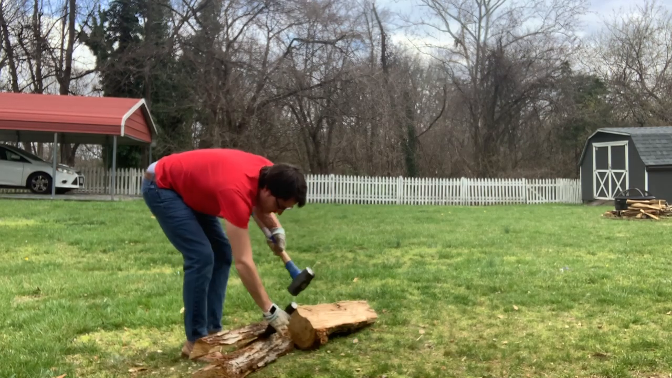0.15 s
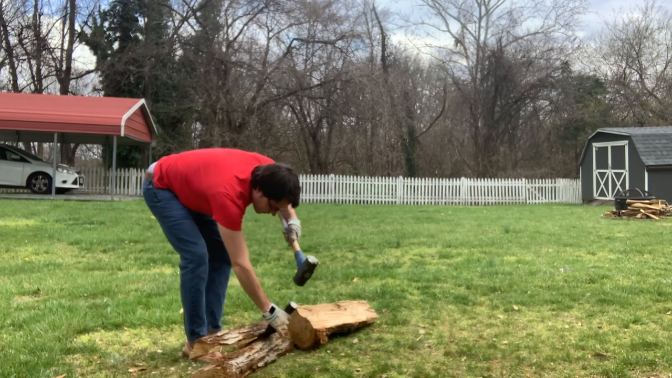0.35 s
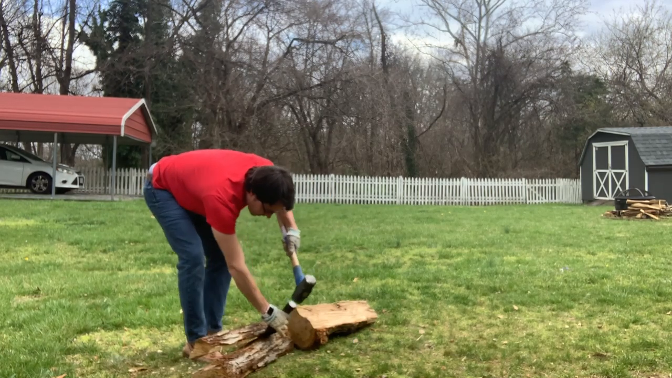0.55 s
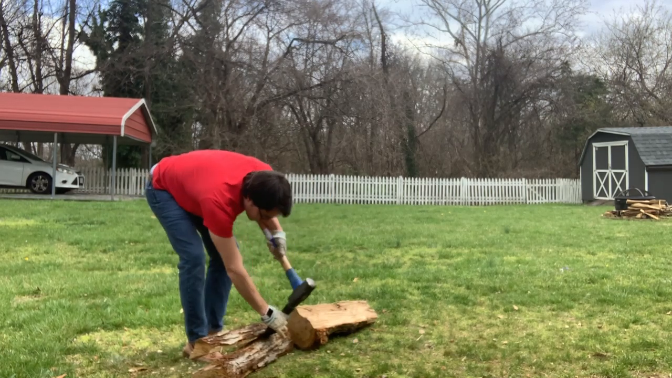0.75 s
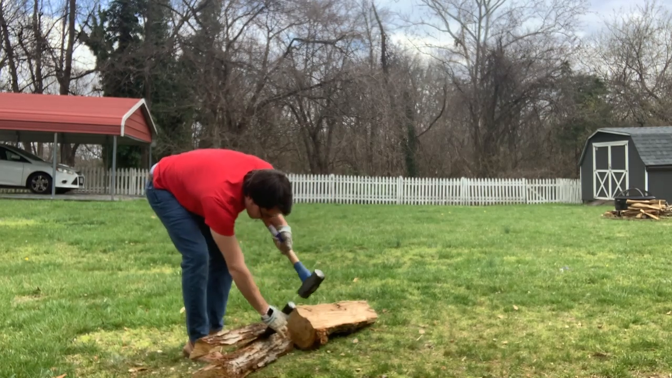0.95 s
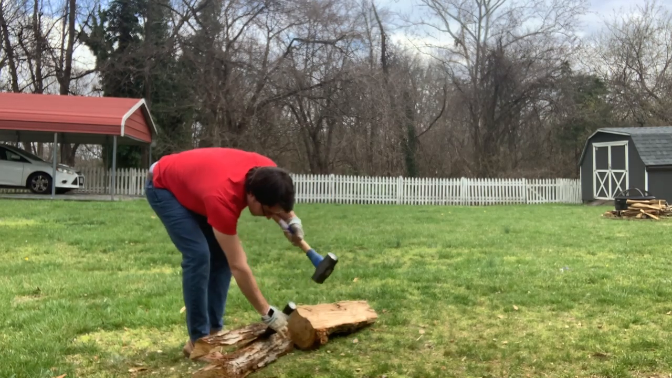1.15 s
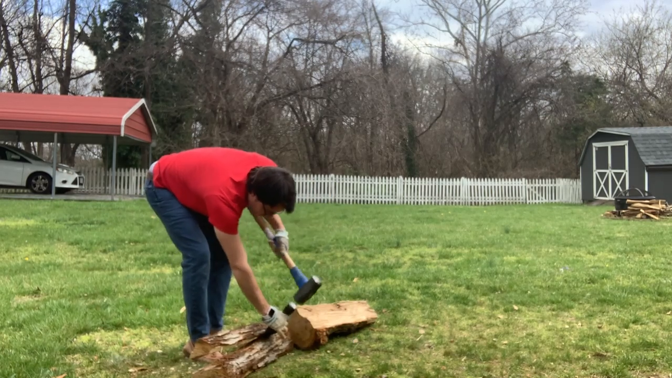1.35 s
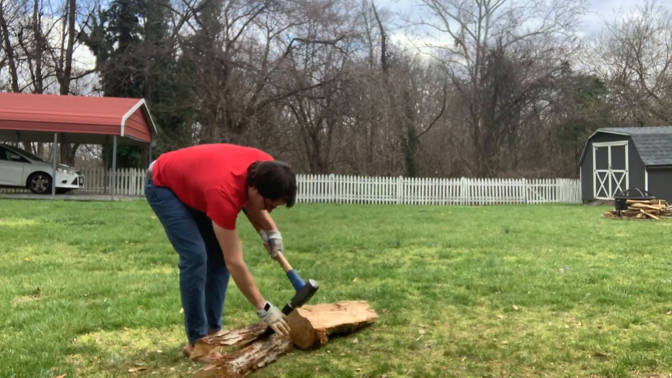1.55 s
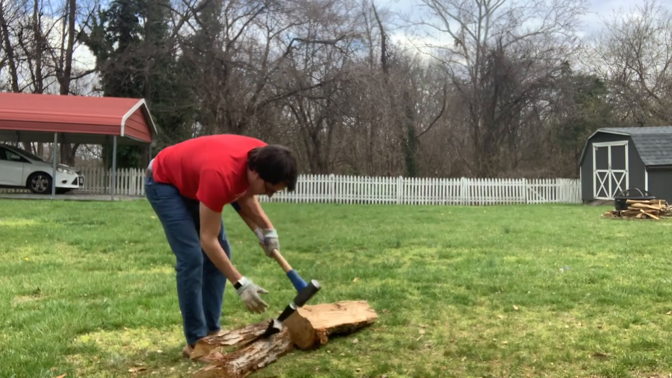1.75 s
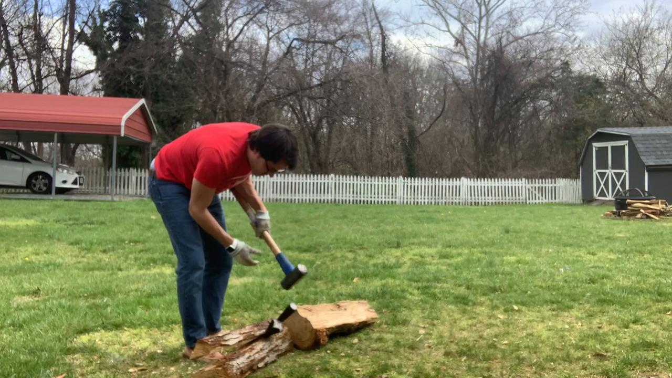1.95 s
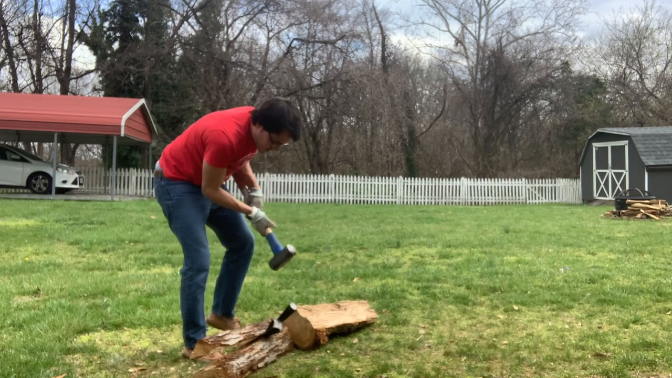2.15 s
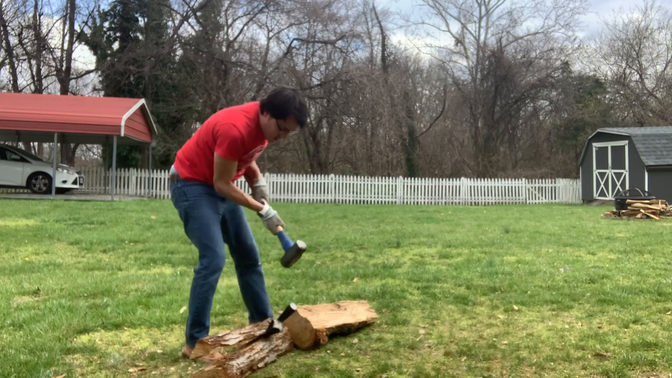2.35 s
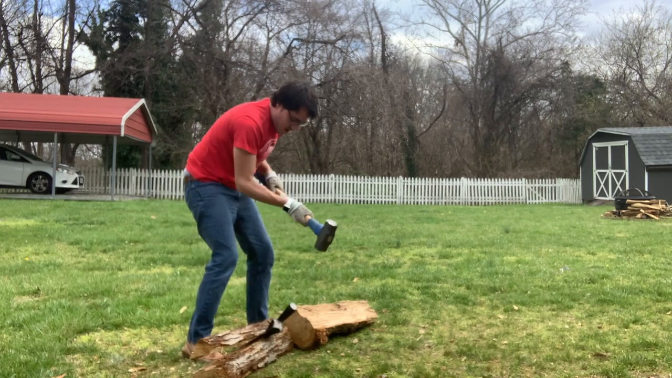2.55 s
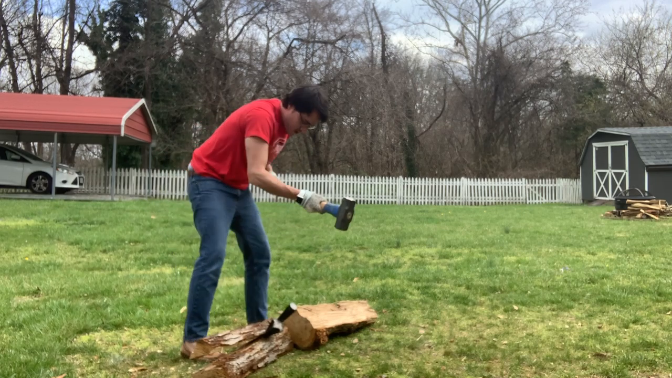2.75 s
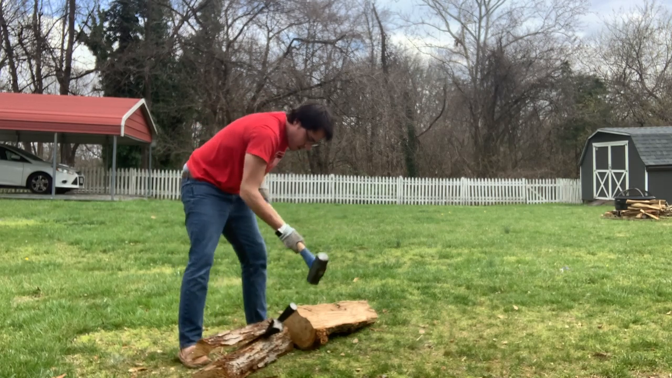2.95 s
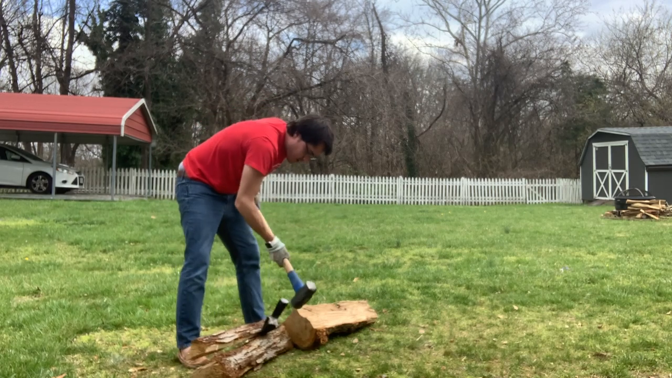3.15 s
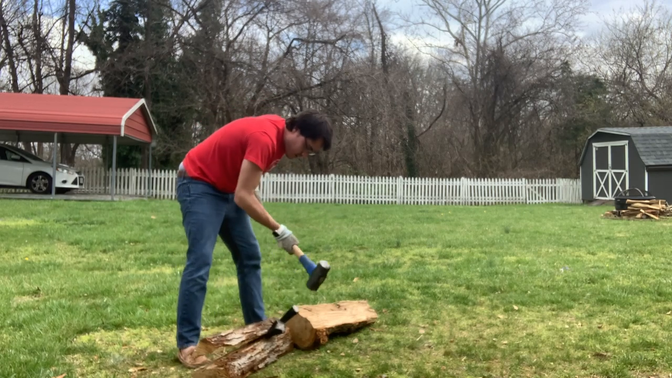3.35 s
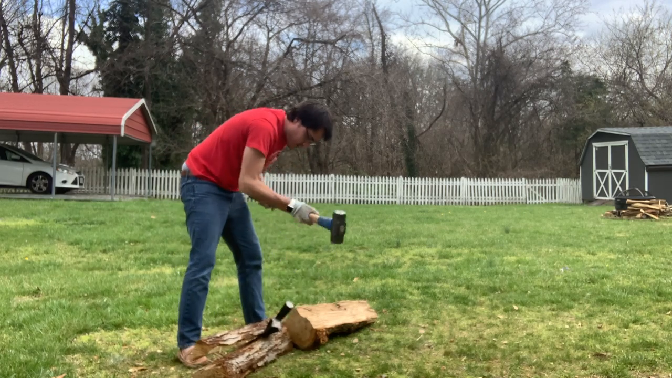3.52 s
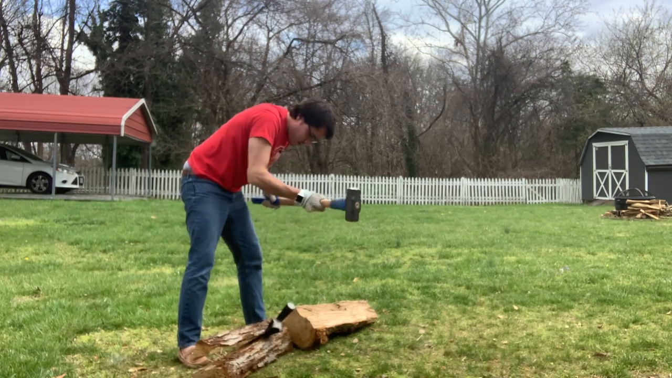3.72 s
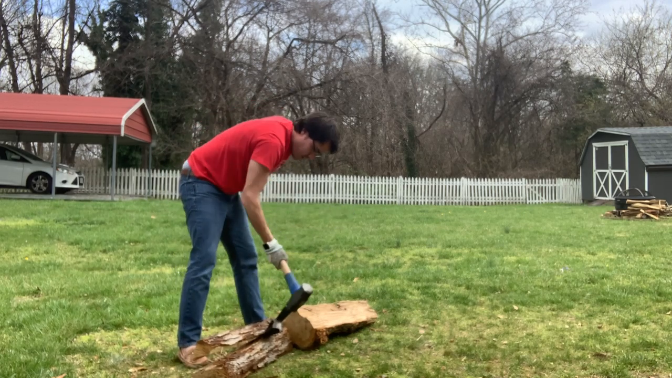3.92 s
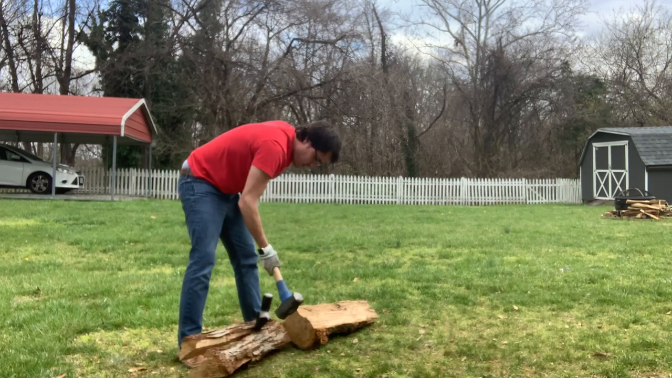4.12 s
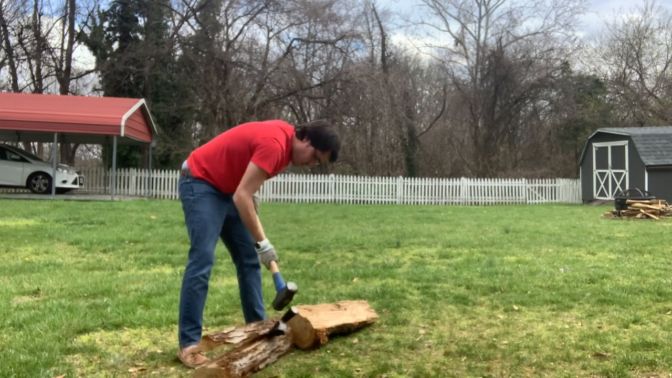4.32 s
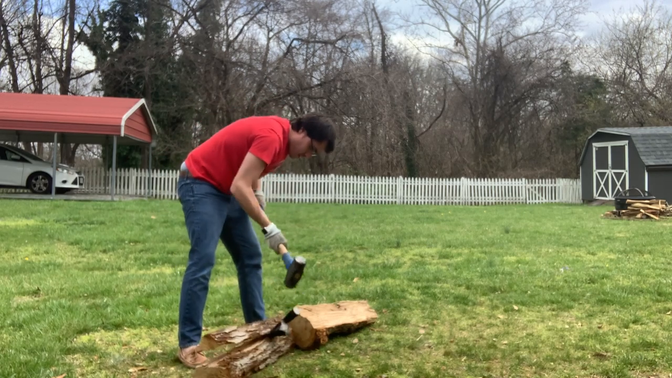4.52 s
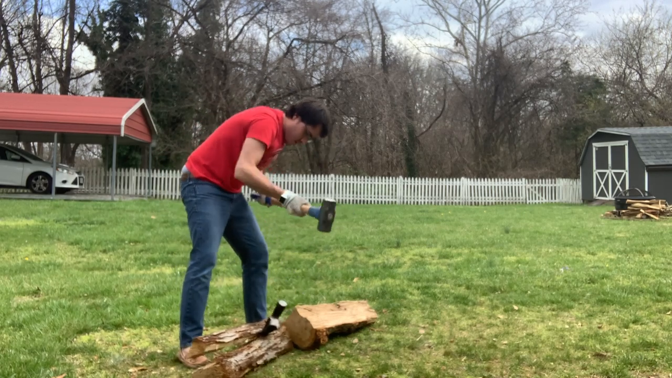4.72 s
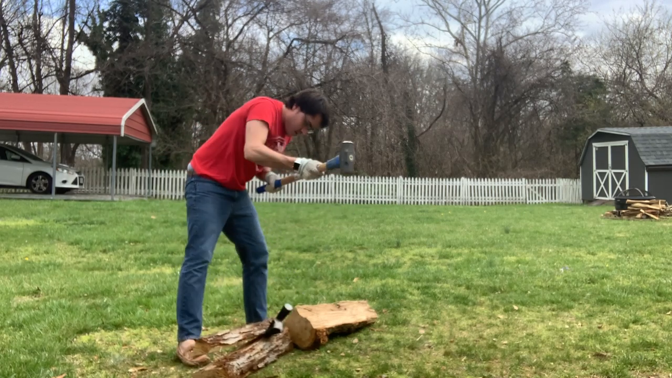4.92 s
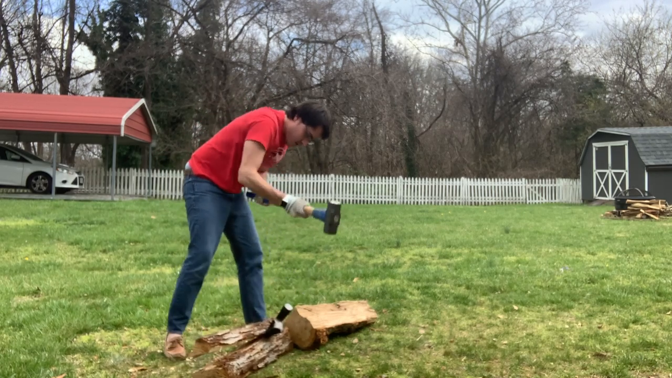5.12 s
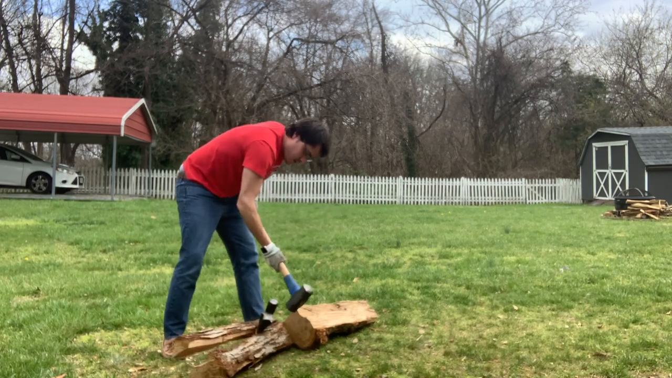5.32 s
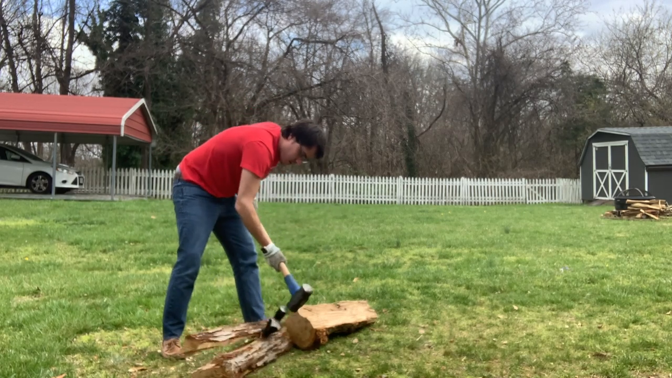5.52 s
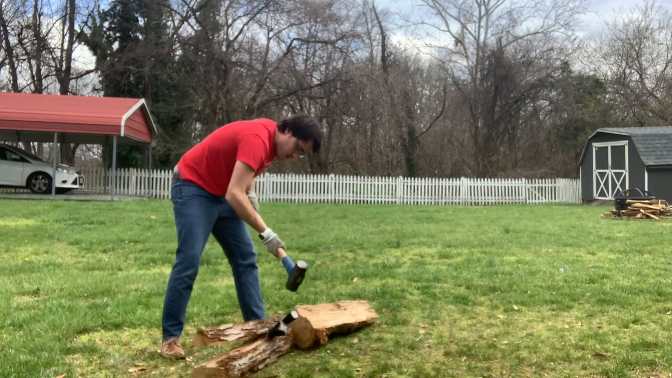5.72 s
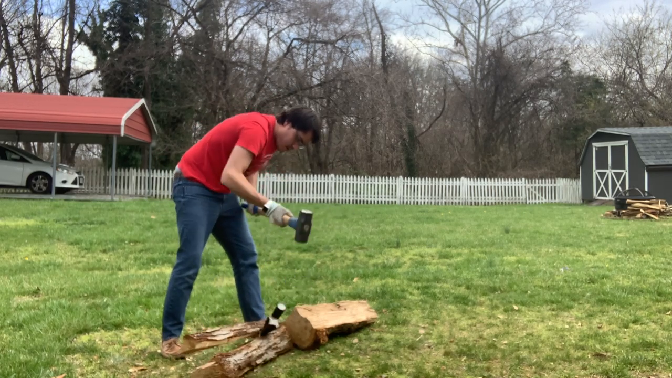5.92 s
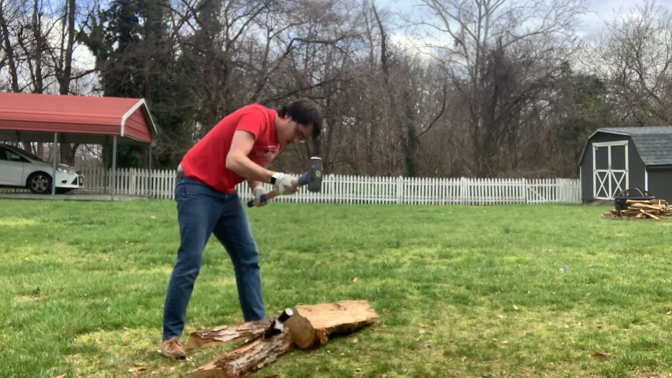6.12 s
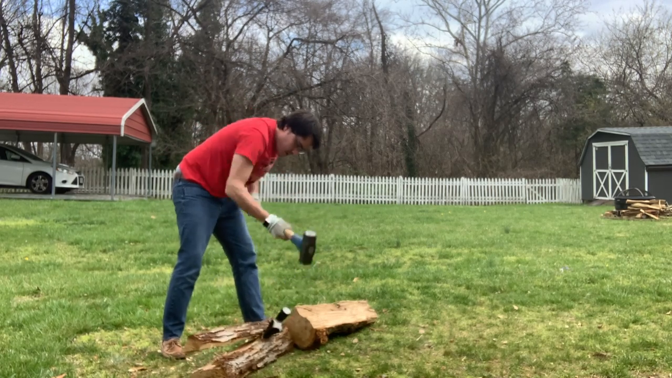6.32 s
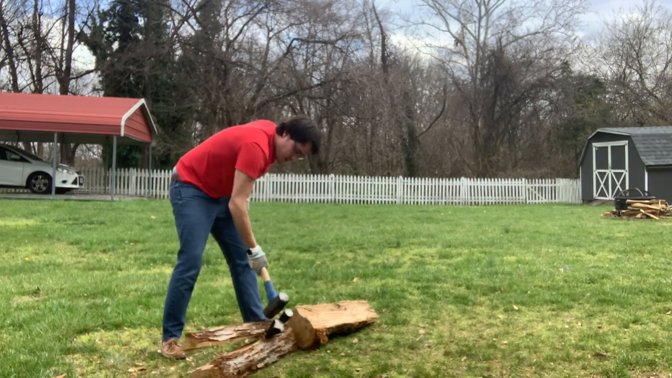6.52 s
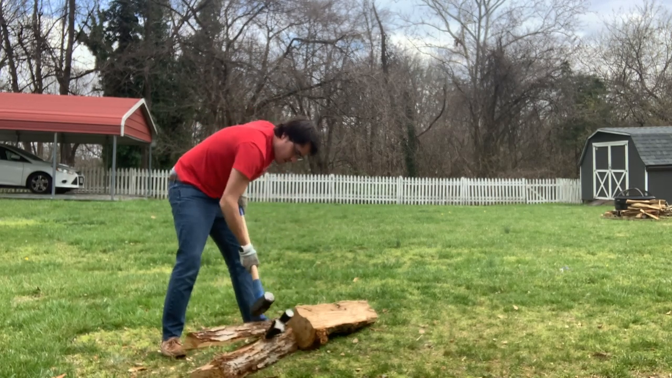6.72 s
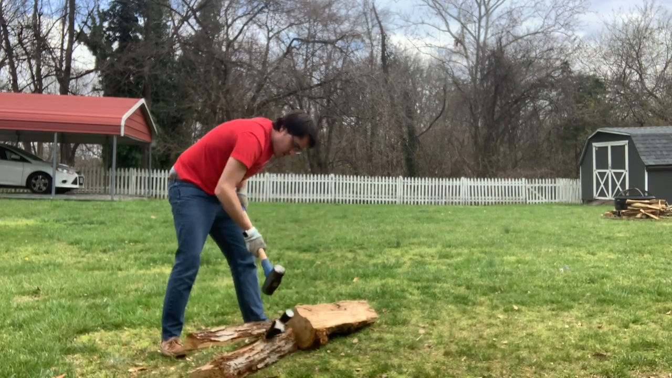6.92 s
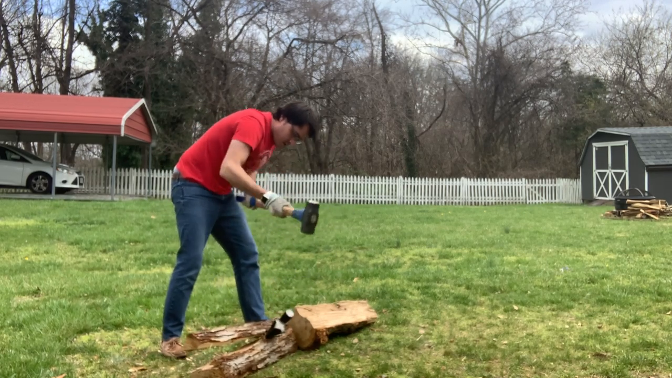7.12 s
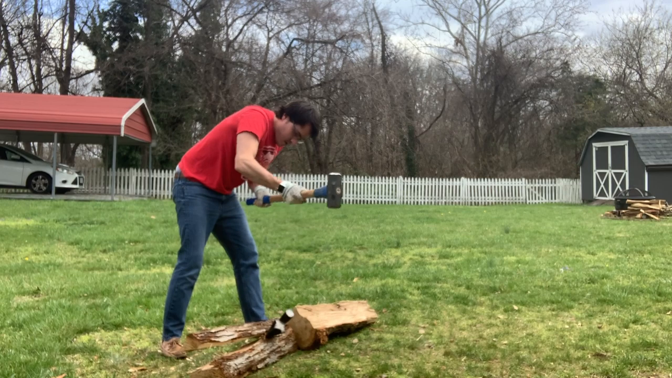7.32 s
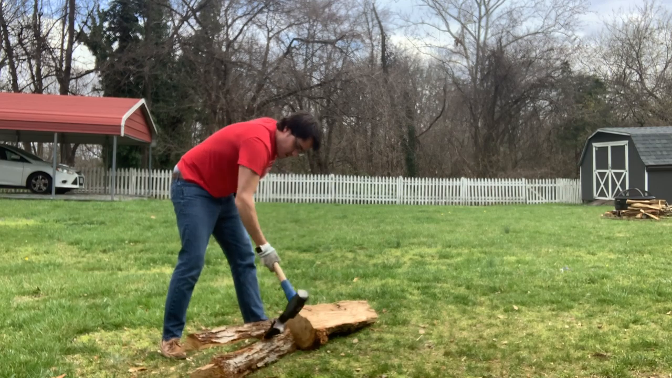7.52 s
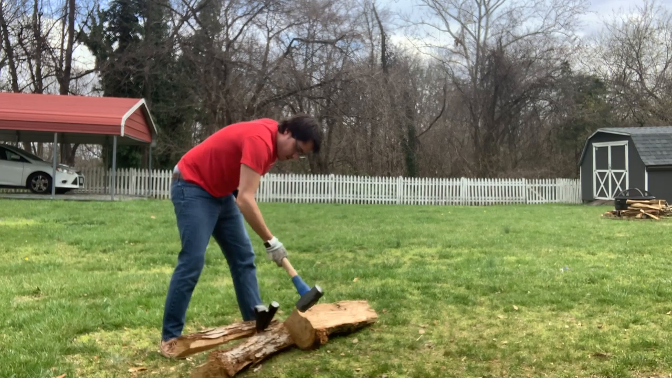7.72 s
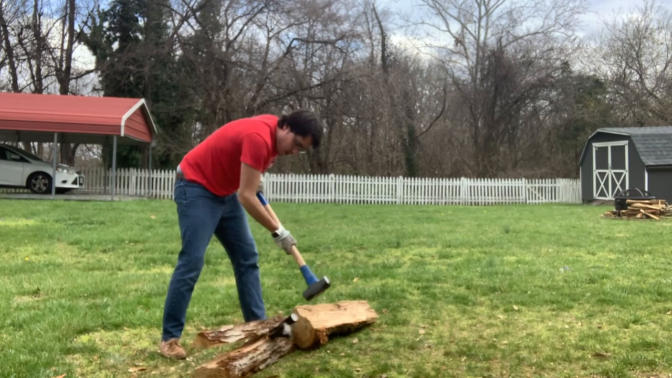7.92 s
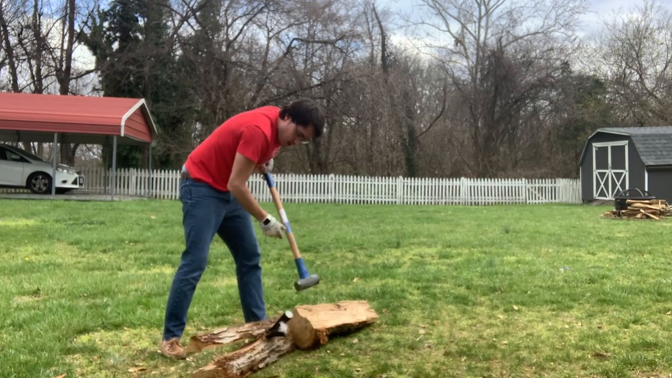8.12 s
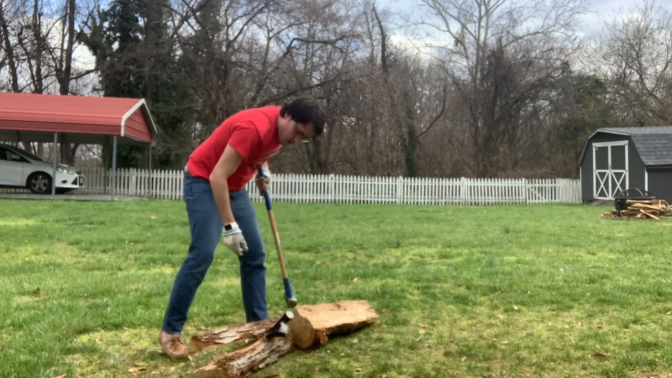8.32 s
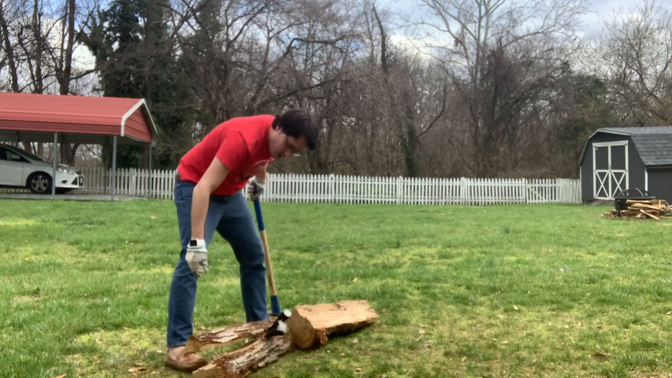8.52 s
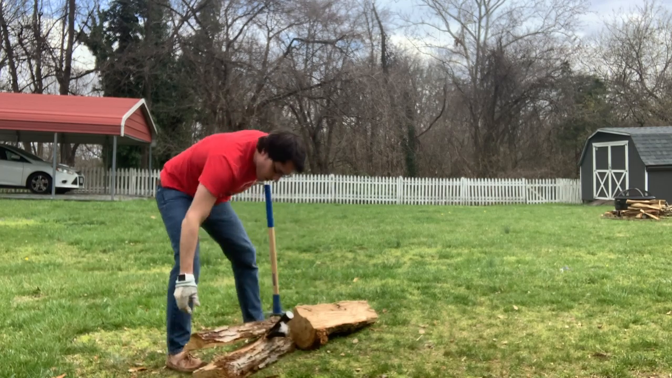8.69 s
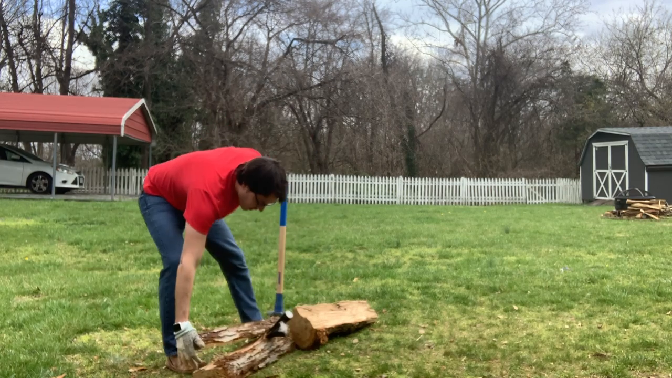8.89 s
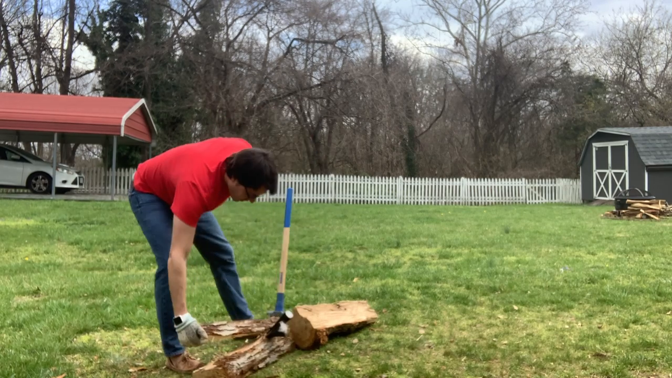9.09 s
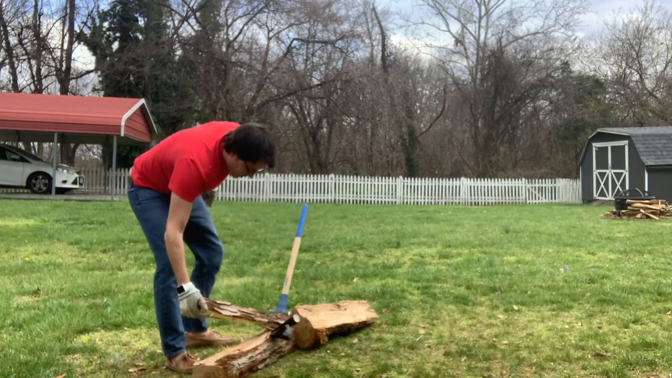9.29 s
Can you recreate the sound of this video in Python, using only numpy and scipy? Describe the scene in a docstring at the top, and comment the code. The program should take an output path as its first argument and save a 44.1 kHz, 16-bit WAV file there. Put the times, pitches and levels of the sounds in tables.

```python
"""An open lawn by a picket fence and woods, two microphones near a log: a sledgehammer drives in a steel wedge.
Two setting taps and five full blows are shaped noise for the clank, with dying sines for steel, log and ground.
Falling sweeps and noise make the hammer knock on the log, noise ticks are chips and, at last, crackling bark.
Boots press the turf as low sines; fence and woods answer through scattered noise echoes.
Far off, filtered noise makes a low rumble, the hush of trees and a frog chorus; birds are gliding sines."""
import sys
import numpy as np
from scipy import signal
from scipy.fft import rfft, irfft, next_fast_len
from scipy.io import wavfile
from scipy.ndimage import uniform_filter1d, map_coordinates

SR = 44100
rng = np.random.default_rng(int(sys.argv[2]) if len(sys.argv) > 2 else 0)


def wav_record(signal):
    """Record a signal, one row per channel, as 16-bit PCM in the file named by sys.argv[1]."""
    frames = np.transpose(np.atleast_2d(signal))
    bounded = np.clip(frames, -1, 1)
    # unit amplitude maps onto the largest positive 16-bit level
    quanta = np.round(bounded * 32767).astype(np.int16)
    wavfile.write(sys.argv[1], SR, quanta)


N = 412323

# spectrum of breaking bark: (frequency [Hz], level per Hz [dB])
BARK_SPECTRUM = [(100, -5), (400, -4), (900, -16.5), (1900, -12.5), (3500, 2.5), (6000, 1), (8500, -5.5),
                 (12000, -4.5), (15000, -28)]
# the bark starts to give, and is soon under full strain
STRAIN_START_S, STRAIN_RISE_S = 8.95, .17


def amp(db):
    """Decibels to gain."""
    return 10 ** (np.asarray(db) / 20)


def unit(x):
    """Scales to rms 1."""
    return x / np.sqrt(np.mean(x ** 2) + 1e-30)


def read(points, hz):
    """Reads a table on a log-frequency axis."""
    f, value = np.transpose(points)
    return np.interp(np.log(hz + 1), np.log(f + 1), value)


def between(ends, share):
    """The value a share of the way from one end to the other."""
    return ends[0] + (ends[1] - ends[0]) * share


def curve(rows):
    """A level curve in dB over time as a gain for every sample."""
    return amp(np.interp(np.arange(N) / SR, *np.transpose(rows)))


def add(mix, s, sound):
    """Mixes a stereo sound in at time s."""
    part = mix[:, round(s * SR):][:, :sound.shape[-1]]
    part += sound[:, :part.shape[1]]


def delayed(sound, seconds):
    """A stereo sound moved later, cut to its old length."""
    return np.pad(sound, ((0, 0), (round(seconds * SR), 0)))[:, :sound.shape[1]]


def colour(x, db_at):
    """Zero-phase filter with a gain in dB given as a function of frequency."""
    size = next_fast_len(x.shape[-1])
    gain = amp(db_at(np.fft.rfftfreq(size, 1 / SR)))
    return irfft(rfft(x, size) * gain, size)[..., :x.shape[-1]]


def ports(x, count=3):
    """Sound from the log reaches the left microphone a few samples early."""
    return np.array([x, np.pad(x, (count, 0))[:len(x)]])


def noise(size, db_at, alike):
    """Coloured stereo noise: a share comes straight from the log, the rest from all around."""
    straight = np.sqrt(alike) * ports(rng.standard_normal(size))
    around = np.sqrt(1 - alike) * rng.standard_normal((2, size))
    return unit(colour(straight + around, db_at))


def surround(shape):
    """White noise from all around, as the two microphones pick it up."""
    # left-right likeness of sound from all around: (frequency [Hz], correlation [-1 to 1])
    likeness = [(30, .4), (60, 0.6), (99, 0.65), (160, 0.8), (270, 0.36), (450, 0.16), (740, -0.5),
                (1220, -0.46), (2010, -0.1), (3330, 0.2), (5500, -0.06), (9080, 0.6)]
    size = next_fast_len(shape[1])
    left, other = rfft(rng.standard_normal((2, size)))
    alike = np.clip(read(likeness, np.fft.rfftfreq(size, 1 / SR)), -1, 1)
    right = alike * left + np.sqrt(1 - alike ** 2) * other
    return irfft(np.array([left, right]), size)[:, :shape[1]]


def bands(x, centres):
    """Splits into overlapping bands that sum to the whole."""
    hz, spectrum = np.fft.rfftfreq(x.shape[-1], 1 / SR), rfft(x)
    hats = [list(zip(centres, hat)) for hat in np.eye(len(centres))]
    return [irfft(spectrum * read(hat, hz), x.shape[-1]) for hat in hats]


def fade(x, decays, t):
    """Each band builds up and dies away at its own speed."""
    parts = bands(x, [band[0] for band in decays])
    return sum(part * (1 - np.exp(-t / rise)) * amp(-60 * t / t60)
               for part, (_, rise, t60) in zip(parts, decays))


def ring(modes, t):
    """Dying sines, each met at its own random phase."""
    return sum(amp(db - 60 * t / t60) * np.sin(2 * np.pi * (hz * t + rng.random()))
               for hz, db, t60 in modes)


def ring_around(modes, t, side_db):
    """Modes that radiate unevenly, so that each microphone meets them at its own level and phase."""
    return ports(ring(modes, t)) + amp(side_db) * np.array([[1], [-1]]) * ring(modes, t)


def swell(depth_db, rate_hz):
    """A random gain that wanders mostly slower than the given rate, by this rms depth."""
    drift = colour(rng.standard_normal(N), lambda hz: -20 * np.log10(1 + (hz / rate_hz) ** 2))
    return amp(depth_db * unit(drift))


def wash(db_at):
    """A steady coloured noise from all around, at rms 1."""
    return unit(colour(surround((2, N)), db_at))


def rumble(low_cut_hz=36):
    """Low outdoor noise whose level moves in lumps."""
    # (frequency [Hz], level per Hz [dB])
    rumble_spectrum = [(12, -45), (20, -20.5), (40, -3.5), (76, 2.5), (119, -3), (147, -11), (208, -14),
                       (340, -33), (400, -36.5), (520, -61), (880, -120)]
    # it builds up early on, then roughly holds: (time [s], level [dB])
    rumble_level = [(0, -61), (2.2, -55), (6, -53.5), (9.3, -55.5)]
    low_cut = lambda hz: -10 * np.log10(1 + (low_cut_hz / (hz + 1)) ** 6)
    low = wash(lambda hz: read(rumble_spectrum, hz) + low_cut(hz))
    return low * curve(rumble_level) * swell(depth_db=3.5, rate_hz=6)


def breeze(hush_db=-73, swell_db=7, peak_s=3.1, rise_s=1.4, fall_s=6.5):
    """The gain of the trees' hush: one breeze comes up and slowly dies down."""
    t = np.arange(N) / SR - peak_s
    return amp(hush_db + swell_db * np.exp(-(t / np.where(t < 0, rise_s, fall_s)) ** 2))


def tree_hush():
    """The trees hush as broad noise that swells with the breeze."""
    # (frequency [Hz], level per Hz [dB])
    air_spectrum = [(150, -35.5), (250, -3.5), (429, -7.5), (538, -8), (1100, -11), (1700, -12.5),
                    (2240, -14.5), (2530, -12), (2810, -16.5), (6590, -33), (8550, -47.5), (11900, -34.5),
                    (16000, -61)]
    return wash(lambda hz: read(air_spectrum, hz)) * breeze() * swell(depth_db=.8, rate_hz=4)


def frogs(centre_hz=2545, width_hz=60):
    """A far frog chorus, merged by distance into one narrow band of noise."""
    # the chorus holds, then thins out: (time [s], level [dB])
    chorus_level = [(0, -75.5), (4.9, -73), (5.9, -84), (9.3, -80.5)]
    band = lambda hz: -20 * np.log10(1 + ((hz - centre_hz) / width_hz) ** 2)
    return wash(band) * curve(chorus_level)


def rattle(modes, t, share=.55, width_hz=100, strike_db=1.2):
    """Steel chatters on steel and wood: each mode flutters into a narrow band, its level new every blow."""
    r = np.exp(-np.pi * width_hz / SR)
    sound = np.zeros(len(t))
    for hz, db, t60 in modes:
        # the first half of the filtered noise is run-in
        white = rng.standard_normal((2, 2 * len(t)))
        a, b = signal.lfilter([1], [1, -2 * r, r * r], white)[:, len(t):]
        flutter = np.sqrt(1 - share) + np.sqrt(share / 2) * (unit(a) + 1j * unit(b))
        level = amp(db + strike_db * rng.standard_normal() - 60 * t / t60)
        sound += level * (flutter * np.exp(2j * np.pi * (hz * t + rng.random()))).real
    return sound


def uneven(x, count=260, ripple_db=4):
    """A crowd of weaker modes, different for every strike point, ripples the spectrum."""
    ripple = ripple_db * np.clip(rng.standard_normal(count), -2, 2)
    return colour(x, lambda hz: np.interp(hz, np.linspace(0, SR / 2, count), ripple))


def punch(t, hz=1750, length=.0007):
    """The head stops dead against the wedge and sends out one sharp swing of pressure."""
    return np.sin(2 * np.pi * hz * t) * t / length * np.exp(1 - t / length)


def glance(s, sound, gains_db):
    """Where the face lands lifts some regions of the blow and dulls others."""
    # centres of the regions that change with the strike point: (frequency [Hz])
    glance_hz = (200, 780, 2300, 7600)
    # the regions between them, which do not: (frequency [Hz])
    steady_hz = (70, 430, 1400, 3100, 4800, 10500)
    shape = sorted(list(zip(glance_hz, gains_db)) + [(hz, 0) for hz in steady_hz])
    # the zero-phase filter also spreads ahead of the blow, so leave 20 ms of room
    lead = SR // 50
    padded = np.pad(sound, ((0, 0), (lead, 0)))
    return s - lead / SR, colour(padded, lambda hz: read(shape, hz))


def blow(row, depth):
    """The faces crack together and meet again as the wedge springs back; wedge, log and ground ring on."""
    # the dense clank of steel in wood: (frequency [Hz], level per Hz [dB])
    clank_spectrum = [(12, -51), (30, -22.5), (70, 4.5), (160, 1.5), (250, 0), (450, -2), (650, -1.5),
                      (900, -2.5), (1250, -5.5), (3200, -1.5), (4700, -2), (6000, -5.5), (7200, -4.5),
                      (8500, -27), (13300, -13), (14700, -62)]
    # how the clank builds and dies: (frequency [Hz], rise [s], t60 [s])
    clank_decay = [(80, .002, 0.24), (350, .0018, 0.16), (1000, 0.0019, 0.12), (2630, 0.00035, 0.23),
                   (5440, 0.00022, 0.17), (12000, 0.00026, 0.15)]
    # the share of the clank that comes straight from the log: (frequency [Hz], share of power [0 to 1])
    direct_share = [(130, .9), (300, 0.4), (640, 0.45), (1400, 0.67), (3000, 0.87), (7000, 0.19),
                    (13000, 1)]
    # the thin edge of the wedge rings until the wood grips it: (frequency [Hz], level [dB], t60 [s])
    edge_modes = [(4990, -31, 0.13), (5150, -26.5, 0.19), (5250, -28, 0.18), (5640, -36, .14)]
    # the hammer head: (frequency [Hz], level [dB], t60 [s])
    hammer_modes = [(3160, -35, 0.09), (3350, -35, .05), (3570, -34, 0.14), (7140, -34, 0.1),
                    (8560, -45, .06), (9830, -34, 0.03), (9873, -34, 0.13), (11330, -33, .08),
                    (13020, -38, 0.1), (13905, -38, 0.16)]
    # the wedge bends, all modes shifted together by the wood's grip:
    # (multiple of the bending pitch [ratio], level [dB], t60 [s])
    wedge_modes = [(.5, -34.5, 0.037), (0.669, -29, 0.062), (.74, -28.5, 0.045), (.975, -23, 0.043),
                   (1.019, -26, 0.04), (0.587, -36, .06), (1.22, -29, 0.056), (1.36, -28.5, 0.045),
                   (1.511, -31, 0.038)]
    clank_db, crack_db, punch_db, clang_db, log_db = -24, -19, -16, -23, -30
    clang_t60, log_rise_s, build_s, side_db = .052, .004, .00046, -8
    # the log bounces on the soil
    ground_hz, ground_t60 = 78.5, .23

    s, force_db, delay, rebound_db, clang_hz, partner_hz, clang_ring_db, bend_hz, bend_db = row[:9]
    log_hz, log_ring_db, log_t60, hammer_db, ground_db, edge_db, square_db, *gains_db = row[9:]
    t = np.arange(SR // 2) / SR

    # pairs are (wedge just set, wedge fully driven): the deeper it sits, the more log and ground
    # take up the blow, the longer the faces stay together and the duller the treble
    thud_db, wood_db = between((-5, 10.5), depth), between((0.5, 10), depth)
    contact_s = between((0.00052, 0.0064), depth)
    # every dB of force adds one dB of treble
    bright_db = between((4, -4), depth) + force_db
    tone = [(130, thud_db), (500, wood_db), (900, 0.0012), (3000, 0.012), (7000, bright_db)]
    spectrum = lambda hz: read(clank_spectrum, hz) + read(tone, hz)
    share = lambda hz: np.clip(read(direct_share, hz), .01, .99)

    straight = colour(ports(rng.standard_normal(len(t))), lambda hz: 10 * np.log10(share(hz)))
    around = colour(rng.standard_normal((2, len(t))), lambda hz: 10 * np.log10(1 - share(hz)))
    # the heavy log and the soil get moving later than the steel
    clank = fade(unit(uneven(colour(straight + around, spectrum))), clank_decay, t)

    again = 1 - np.exp(-np.maximum(t - delay, 0) / build_s)
    contacts = np.exp(-(t / contact_s) ** 4)
    contacts = contacts + amp(rebound_db) * again * np.exp(-((t - delay) / contact_s) ** 4)
    crack_spectrum = lambda hz: spectrum(hz) + read([(200, -20.0), (1000, 8.5)], hz)
    crack = noise(len(t), crack_spectrum, alike=0.92) * contacts

    def twice(sound, db):
        """The rebound sets the same modes ringing afresh."""
        return sound() + amp(rebound_db + db) * again * delayed(sound(), delay)

    def bending():
        """The wedge bends."""
        return ring_around([(k * bend_hz, db + bend_db, t60) for k, db, t60 in wedge_modes], t, side_db)

    def clang():
        """Two strong wedge modes chatter."""
        pair = [(clang_hz, 0, clang_t60), (partner_hz, -2, clang_t60)]
        return ports(amp(clang_db + clang_ring_db) * rattle(pair, t))

    def log():
        """The log rings at its own pitch."""
        mode = [(log_hz, log_db + log_ring_db, log_t60)]
        return ring_around(mode, t, side_db) * (1 - np.exp(-t / log_rise_s))

    head_and_edge = ports(amp(hammer_db) * rattle(hammer_modes, t) + amp(edge_db) * rattle(edge_modes, t))
    steel = head_and_edge + twice(bending, db=-3.5) + twice(clang, db=4)
    metal = (amp(crack_db) * crack + steel) * (1 - np.exp(-t / build_s))
    metal = metal + amp(punch_db + square_db) * ports(punch(t))
    ground = ports(ring([(ground_hz, ground_db, ground_t60)], t) * (1 - np.exp(-t * ground_hz)))
    whole = amp(clank_db) * clank + metal + twice(log, db=2.5) + ground
    return glance(s, amp(force_db) * whole, gains_db)


def blows():
    """Each blow sinks the wedge into the log in step with its force."""
    # (time [s], force [dB], rebound delay [s], rebound [dB], wedge clang [Hz], its partner [Hz],
    #  clang [dB], wedge bending [Hz], bending [dB], log pitch [Hz], log ring [dB], log t60 [s],
    #  hammer ring [dB], ground thud [dB], edge ring [dB], punch [dB],
    #  bass [dB], low middle [dB], high middle [dB], treble [dB]); levels are relative
    blow_rows = [(0.6241, -10.5, 0.017, 1.5, 2990, 3040, 0, 1790, 1.5, 424, 2.5, .13, -1.5, -57, -4.5, 4.5, -0.5, 5.5, -2, -4),
                 (1.409, -3, 0.019, 0, 3024, 3010, -1, 1870, 0, 431.6, -2, 0.11, 7, -59, 4.5, 1, 0, 6, 3.5, -4),
                 (3.0462, 2.5, .013, -3.5, 3040, 3120, -1.5, 1819, 0, 412, -9, .1, 0, -51, -2, -6, -3.5, -3, -1.5, -4),
                 (3.9579, -1.5, 0.0091, 0.5, 2928, 3185, 6, 1760, 3.5, 380, -12.5, .06, 5, -45.5, -1, -4.5, -3, 2, 1.5, -1.5),
                 (5.2619, 2, 0.014, -3, 3076, 3236, -1.5, 1765, -7.5, 410.5, -4, .06, 2.5, -45, -10, -10.5, -2, 1.5, 1.5, -2.5),
                 (6.4248, -2, .011, -7.5, 3047, 3363, 8, 1792, 4.5, 497, 17, 0.033, -2.5, -49.5, -34, -7, -1, 0, -2, 8),
                 (7.5258, 2.5, .012, -4, 3353, 3203, -3, 1761, 8, 236.5, -12.5, 0.17, -4, -32.5, -20, -16.5, 4, -2, -7.5, -3)]
    sunk = np.cumsum([amp(row[1]) for row in blow_rows])
    return [blow(row, depth) for row, depth in zip(blow_rows, sunk / sunk[-1])]


def sway(x, count=3, sway_s=.00015, sway_hz=40, gap_s=.013):
    """Moving air makes each path of the far echo wander on its own, which blurs its ringing tones."""
    out = np.zeros_like(x)
    for path in range(count):
        drift = colour(rng.standard_normal(N), lambda hz: -10 * np.log10(1 + (hz / sway_hz) ** 6))
        at = np.arange(N) + SR * (sway_s * unit(drift) - gap_s * (path - 1))
        out += [map_coordinates(side, [at], order=2) for side in x]
    return out / np.sqrt(count)


def yard(dry):
    """Scatter from the lawn, a bright slap from the picket fence, and the slow answer of the woods."""
    # the slap from the pickets: (frequency [Hz], level [dB])
    fence_tone = [(3000, -9.5), (6000, -10), (10000, 11), (14000, -4.5)]
    # the echo from the woods: (frequency [Hz], level [dB])
    woods_tone = [(100, -16.5), (400, -3), (1000, 0), (1750, -3), (2400, 1.5), (3100, -3.5), (4000, 0.5),
                  (7000, -4.5), (10000, -10), (13500, -24)]
    # how that echo dies away: (frequency [Hz], t60 [s])
    woods_decay = [(200, 1), (1000, 1), (2600, .85), (5500, .65), (10000, .25)]
    near_db, near_t60 = -20, .069
    fence_db, fence_delay_s, fence_spread_s = -35, .13, .054
    slap_db, slap_s = -3, .01
    woods_db, woods_delay_s = -27.0, .16

    t = np.arange(SR) / SR
    scatter = lambda envelope: unit(surround((2, SR)) * envelope) / np.sqrt(SR)
    near = scatter(amp(-60 * t / near_t60) * (t > .012))
    fence = scatter(np.exp(-((t - fence_delay_s) / fence_spread_s) ** 2))
    slap = scatter((t > fence_delay_s) * np.exp(-abs(t - fence_delay_s) / slap_s))
    fence = colour(fence + amp(slap_db) * slap, lambda hz: read(fence_tone, hz))

    build_up = np.minimum(t / woods_delay_s, 1) ** 2
    trees = bands(scatter(build_up), [band[0] for band in woods_decay])
    late = np.maximum(t - woods_delay_s, 0)
    woods = sum(part * amp(-60 * late / t60) for part, (_, t60) in zip(trees, woods_decay))
    woods = colour(unit(woods) / np.sqrt(SR), lambda hz: read(woods_tone, hz))

    echo = lambda response: signal.fftconvolve(dry, response, axes=1)[:, :N]
    return echo(amp(near_db) * near + amp(fence_db) * fence) + sway(echo(amp(woods_db) * woods))


def knock(s, db, hz, ring_db, top_hz):
    """Hammer on wood, an edge then flat; high bending waves outrun low ones, so each contact falls in pitch."""
    # (frequency [Hz], level per Hz [dB])
    thump_spectrum = [(60, -8.5), (200, -11.5), (450, 1.5), (900, -10.5), (1500, -11), (2400, -8.5),
                      (6000, -51)]
    # the treble comes first: (frequency [Hz], rise [s], t60 [s])
    thump_decay = [(90.5, 0.0045, 0.042), (500, 0.0025, 0.049), (1310, 0.0016, 0.037),
                   (2518, 0.00011, 0.091)]
    # the log rings under a knock: (multiple of its pitch [ratio], level [dB], t60 [s])
    log_modes = [(.55, -3.5, .06), (.72, -3.5, .045), (1, 6.5, 0.09), (1.6, -3.5, .04), (2.299, -3, 0.0346)]
    level_db, thump_db, sweep_db = 1, -2, -3
    # the sweep of the hardest knock starts at hardest_hz; softer ones start lower
    hardest_hz, sweep_end_hz = 2700, 420
    # how fast the pitch falls, and how long the contact sounds
    sweep_s, sweep_hold_s = .004, .008
    # the head settles onto its face just after it lands
    again_s, again_db = .0072, -4

    t = np.arange(SR // 4) / SR
    hardness = min(top_hz / hardest_hz, 1)
    falling_hz = sweep_end_hz + (hardness * hardest_hz - sweep_end_hz) * np.exp(-t / sweep_s)
    sweep = np.sin(2 * np.pi * np.cumsum(falling_hz) / SR)
    sweep = sweep * np.exp(-(t / sweep_hold_s) ** 2) * (1 - np.exp(-t * top_hz))
    spectrum = lambda f: read(thump_spectrum, f) - 10 * np.log10(1 + (f / top_hz) ** 10)

    def contact():
        """One edge or face meets the wood."""
        thump = fade(noise(len(t), spectrum, alike=0.47), thump_decay, t)
        return amp(sweep_db) * hardness * ports(sweep) + amp(thump_db) * thump

    body = ring([(k * hz, ring_db + mode_db, t60) for k, mode_db, t60 in log_modes], t)
    body = body * (1 - np.exp(-t * hz * hardness ** 2 / 2))
    settling = amp(again_db) * delayed(contact(), again_s)
    return s, amp(db + level_db) * (contact() + settling + ports(body))


def knocks(soft_top_hz=874, soft_db=-51, db_per_octave=8.5):
    """The hammer head comes down on the log after a blow; a harder knock reaches higher in pitch."""
    # (time [s], level [dB], pitch [Hz], ring [dB]); levels are relative
    knock_rows = [(1.575, -48, 945, -1.5), (1.615, -52, 854, 2), (3.249, -48.5, 555, -8),
                  (3.58, -54.5, 410, -4.5), (4.2789, -35.5, 558.8, -13.5), (5.079, -51, 481.3, -5),
                  (5.5791, -46.5, 435, -9), (6.559, -47, 497, 1), (7.8642, -38, 718, -10.5)]
    top_hz = lambda db: soft_top_hz * 2 ** ((db - soft_db) / db_per_octave)
    return [knock(s, db, hz, ring_db, top_hz(db)) for s, db, hz, ring_db in knock_rows]


def snap(s, db, tilt):
    """A dry fibre breaks and tears a little further; the duller, larger pieces ring and shake neighbours."""
    level_db, break_t60 = 1, .0052
    tear_db, tear_s = -5, .0027
    scatter_db, scatter_t60 = -13, .19
    piece_hz, piece_db, piece_t60 = 2100, -12, .081
    t = np.arange(SR // 8) / SR
    tick = noise(len(t), lambda hz: read(BARK_SPECTRUM, hz) + tilt * np.log2(hz / 1000 + 1), alike=0.52)
    after = t - tear_s * rng.uniform(.5, 1.5)
    tear = (after > 0) * amp(tear_db - tilt - 60 * abs(after) / break_t60)
    breaks = amp(-60 * t / break_t60) + tear
    neighbours = amp(scatter_db - tilt - 60 * t / scatter_t60)
    modes = [(piece_hz * rng.lognormal(0, 0.24), piece_db - 2 * tilt, piece_t60) for _ in range(6)]
    return s, amp(db + level_db) * (tick * (breaks + neighbours) + ports(ring(modes, t)))


def snaps():
    """Chips land, and later come the loudest snaps of bark."""
    # (time [s], level [dB], brightness [dB per octave]); levels are relative
    snap_rows = [(1.71, -61, 12), (3.248, -49.5, -0.5), (3.268, -55, 5), (3.371, -58.5, 5),
                 (5.586, -57, -1), (6.304, -57.5, 3), (8.4844, -48, 10), (8.5, -54.5, 4), (8.52, -62, 4),
                 (9.045, -78, 7), (9.0941, -47.5, -1), (9.124, -54, 12), (9.145, -33, 2),
                 (9.1564, -40.5, 5), (9.164, -42, 5), (9.185, -37, 0.5), (9.196, -35, 0.5),
                 (9.244, -38.5, 9), (9.2581, -31, 15), (9.268, -33, 10), (9.288, -37.5, 1), (9.306, -44, 6),
                 (9.316, -32.5, 2.5), (9.327, -31.5, 0), (9.338, -29, 11)]
    return [snap(*row) for row in snap_rows]


def whistle(row, waver=0.00566, flutter_db=2, echo_db=-7, echo_t60=0.17, hook_s=.012, glide_s=.06):
    """A far bird moves from start to top pitch, slides to its end pitch and fades; the trees scatter it."""
    s, length, db, start_hz, top_hz, end_hz, peak = row
    t = np.arange(int(length * SR)) / SR
    wobble = lambda: unit(uniform_filter1d(rng.standard_normal(len(t)), size=200))
    hook = start_hz + (top_hz - start_hz) * t / hook_s
    slide = end_hz + (top_hz - end_hz) * np.exp(-((t - hook_s) / glide_s) ** 2)
    hz = np.where(t < hook_s, hook, slide) * (1 + waver * wobble())
    # warped so that it is loudest at the peak's share of the length
    arch = np.sin(np.pi * (t / length) ** (np.log(.5) / np.log(peak)))
    note = amp(db + flutter_db * wobble()) * np.sqrt(arch) * np.sin(2 * np.pi * np.cumsum(hz) / SR)

    late = np.arange(SR // 3) / SR
    trees = unit(rng.standard_normal((2, len(late))) * amp(-60 * late / echo_t60)) / np.sqrt(len(late))
    direct = ports(1. * (late == 0))
    response = (direct + amp(echo_db) * trees) / np.hypot(1, amp(echo_db))
    return s, signal.fftconvolve(note[None], response, axes=1)


def birds():
    """Thin calls from deep in the woods, more echo than note; one bird sings a two-note phrase twice."""
    # thin calls: (time [s], length [s], level [dB], start [Hz], end [Hz])
    thin_rows = [(1.75, .16, -73, 4150, 3950), (2.3, .12, -74, 3250, 2650), (2.39, .13, -72, 1700, 1780),
                 (2.51, .05, -78, 5450, 4500), (4.44, .15, -82, 7500, 7350), (7.222, .07, -79, 6800, 6550),
                 (7.295, .07, -81, 7450, 7350), (7.42, .07, -75, 7550, 8100), (7.98, .24, -82, 6400, 6300),
                 (8.22, .26, -81, 5870, 5800)]
    # when the phrase is sung: (time [s], level [dB])
    phrase_rows = [(6.874, -63.5), (7.255, -64)]
    # a rising note, then a long falling whistle: (delay [s], length [s], relative level [dB],
    #  start [Hz], top [Hz], end [Hz], loudest point [share of length])
    phrase_notes = [(0, .08, -6, 1800, 1850, 2350, .65), (.086, .18, 0, 3200, 3720, 2950, .16)]
    calls = [(s, length, db, hz, hz, end_hz, .35) for s, length, db, hz, end_hz in thin_rows]
    far = [whistle(call, waver=.018, echo_db=7, echo_t60=.3) for call in calls]
    song = [(s + delay, length, db + note_db, *shape)
            for s, db in phrase_rows for delay, length, note_db, *shape in phrase_notes]
    return far + [whistle(note) for note in song]


def step(s, db, hz, rise=0.0167, side_db=-12):
    """A boot presses into soft turf: a short low bump."""
    t = np.arange(SR // 8) / SR
    press = (t / rise * np.exp(1 - t / rise)) ** 3
    return s, press * ring_around([(hz, db, 1)], t, side_db)


def steps():
    """Boots shift on the turf."""
    # (time [s], level [dB], pitch [Hz])
    step_rows = [(6.638, -35, 68.7), (6.834, -38.5, 71.7), (7.093, -39.5, 82.5), (7.97, -46, 132.7)]
    return [step(*row) for row in step_rows]


def strain(level_db, rise_db_per_s):
    """The gain of the giving bark: it comes in quickly, then goes on getting louder."""
    t = np.maximum(np.arange(N) / SR - STRAIN_START_S, 0)
    return np.minimum(t / STRAIN_RISE_S, 1) ** 2 * amp(level_db + rise_db_per_s * t)


def crackle(per_second=1000, spread_db=6, fibre_hz=2200, fibre_t60=0.024):
    """Small fibres of bark give way in clumps as the strain grows; each rings for a moment."""
    clicks_db, fibre_db, fizz_db = -3, -7, -7
    spectrum = lambda hz: read(BARK_SPECTRUM, hz)
    sizes = amp(spread_db * np.minimum(rng.exponential(1, N), 4)) * rng.standard_normal(N)
    clicks = ports(sizes * (rng.random(N) < per_second / SR))
    modes = [(fibre_hz * rng.lognormal(0, 0.264), 0, fibre_t60) for _ in range(8)]
    fibre = ring(modes, np.arange(SR // 20) / SR)
    fibres = unit(signal.oaconvolve(clicks, fibre[None])[:, :N])
    fizz = noise(N, spectrum, alike=0.24)
    bark = amp(clicks_db) * unit(colour(clicks, spectrum)) + amp(fibre_db) * fibres + amp(fizz_db) * fizz
    clumps = swell(depth_db=3, rate_hz=50)
    return strain(level_db=-66, rise_db_per_s=27) * clumps * bark


def scrape():
    """The slab of bark drags over the wood as it peels, catching and slipping."""
    # (frequency [Hz], level per Hz [dB])
    drag_spectrum = [(150, -18), (600, -10), (1300, -6.5), (2800, 1), (7000, -4), (10000, -20)]
    catches = swell(depth_db=4.5, rate_hz=250)
    drag = noise(N, lambda hz: read(drag_spectrum, hz), alike=1.0)
    return strain(level_db=-67, rise_db_per_s=25) * catches * drag


def scene():
    """All the work at the log and the birds, with the yard's echoes and the far background."""
    background = rumble() + tree_hush() + frogs()
    dry = crackle() + scrape()
    for s, sound in blows() + knocks() + snaps() + birds() + steps():
        add(dry, s, sound)
    return background + dry + yard(dry)


def record(dry, ceiling=.5, cutoff_hz=15100):
    """The loudest peaks are rounded off; then the recorder's band limit."""
    lowpass = signal.firwin(255, cutoff_hz, window=("kaiser", 9), fs=SR)
    rounded = dry / (1 + (dry / ceiling) ** 4) ** (1 / 4)
    return signal.oaconvolve(rounded, lowpass[None], "same", axes=1)


dry = scene()
out = record(dry)
wav_record(out)
```